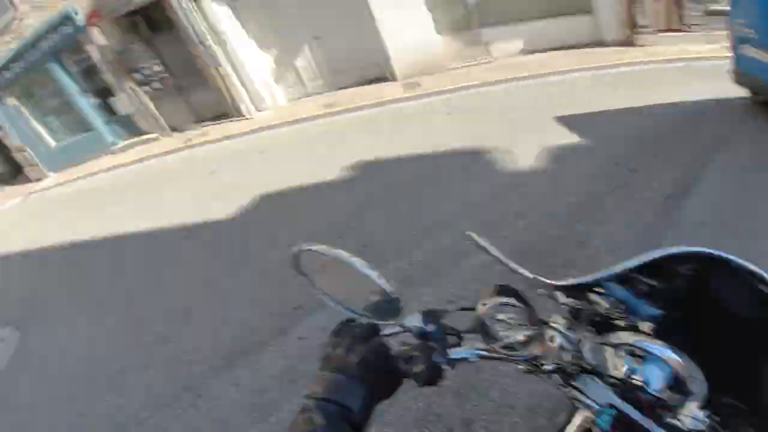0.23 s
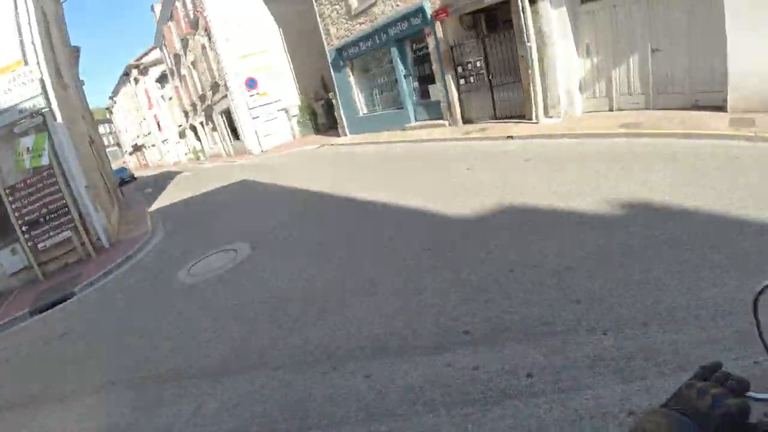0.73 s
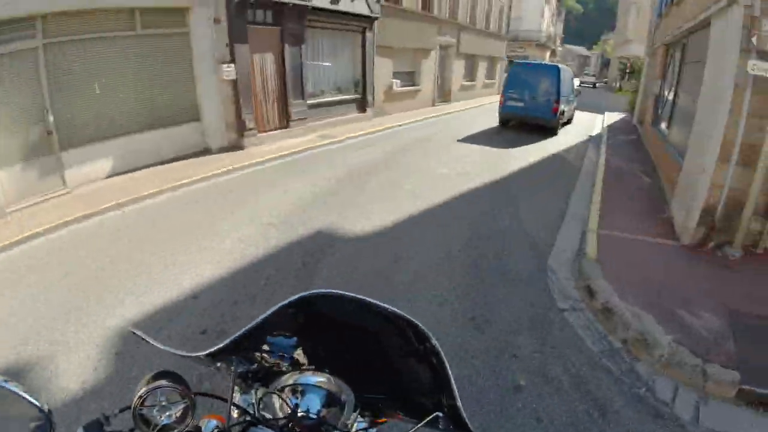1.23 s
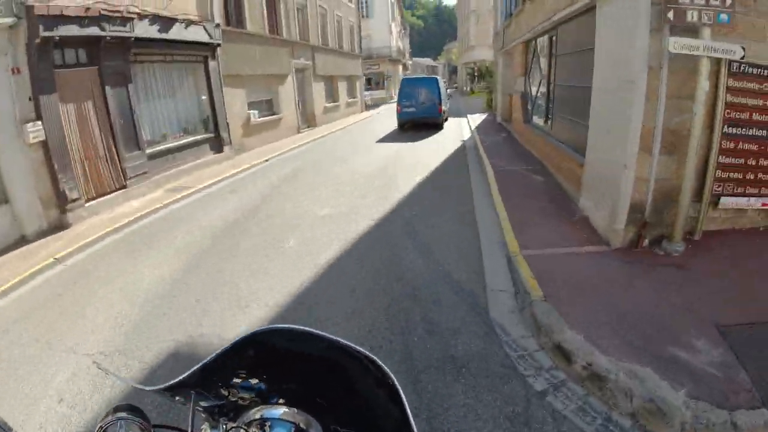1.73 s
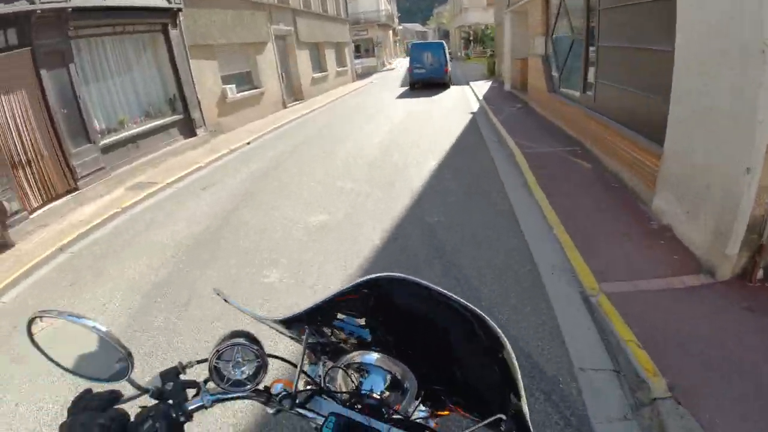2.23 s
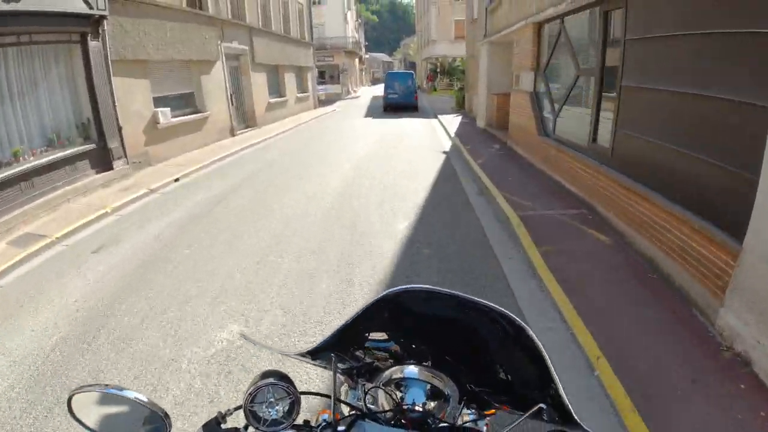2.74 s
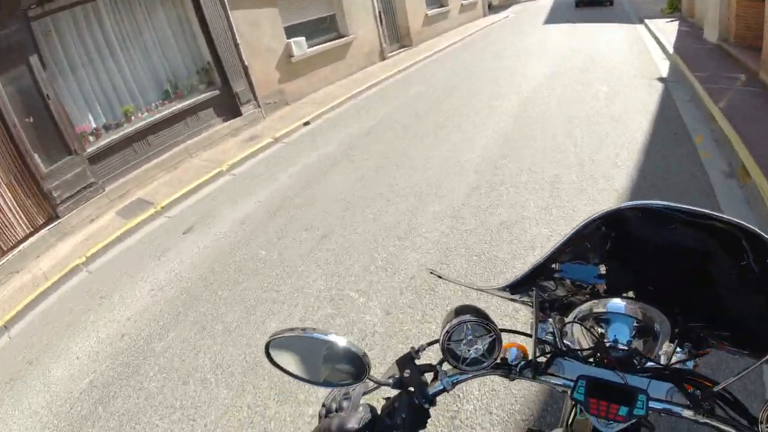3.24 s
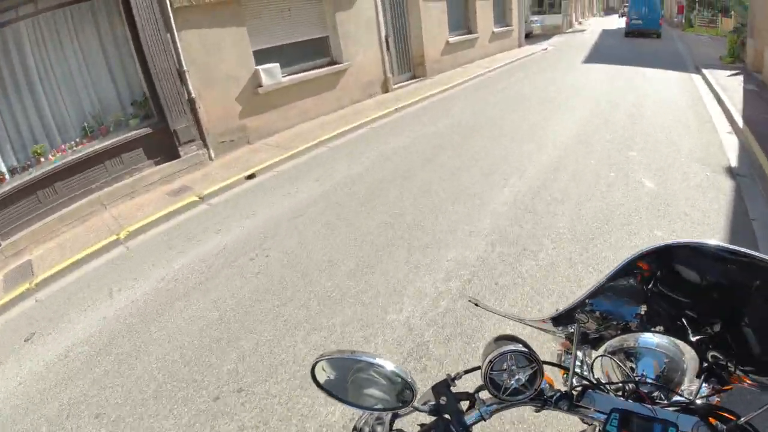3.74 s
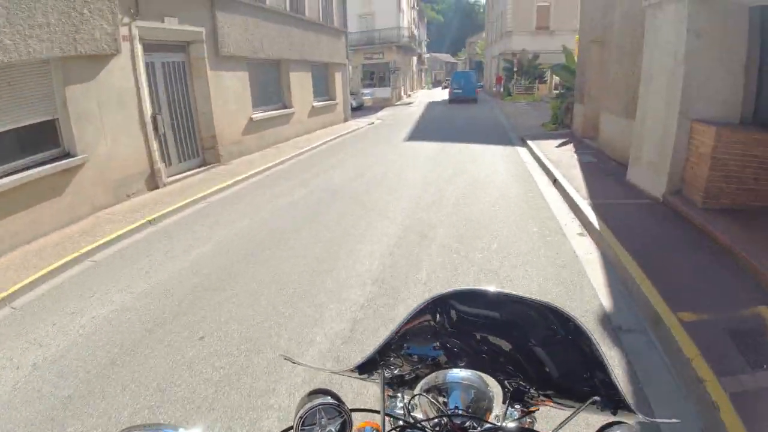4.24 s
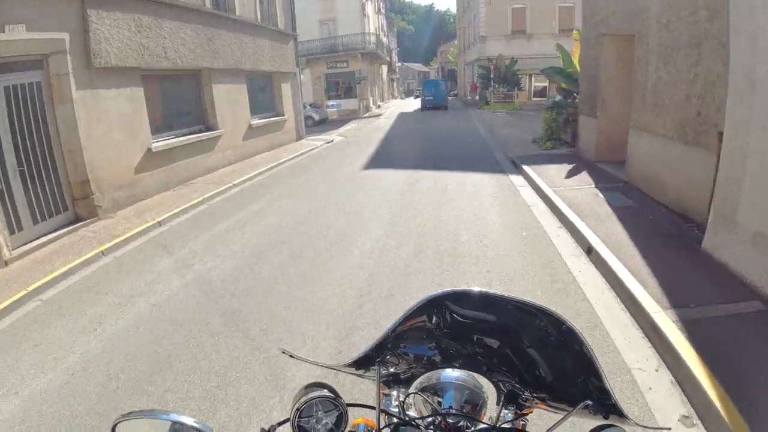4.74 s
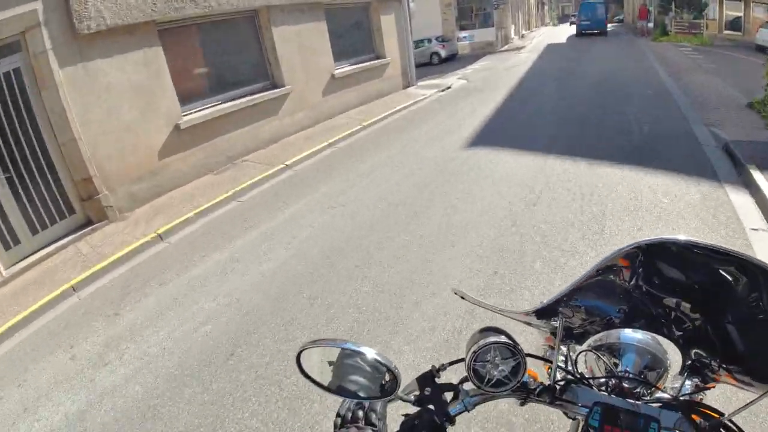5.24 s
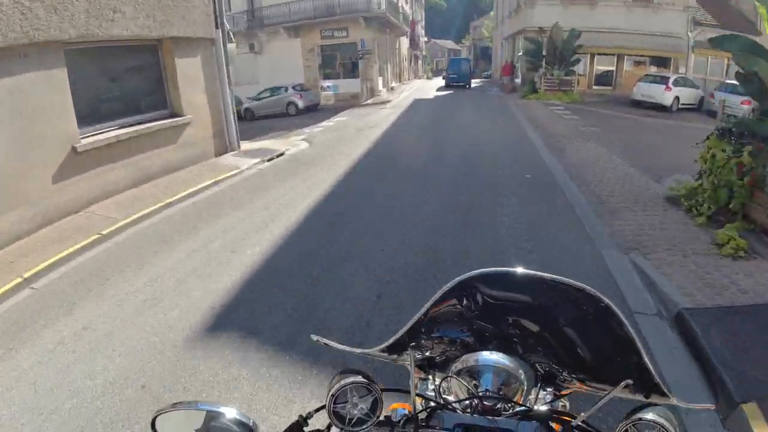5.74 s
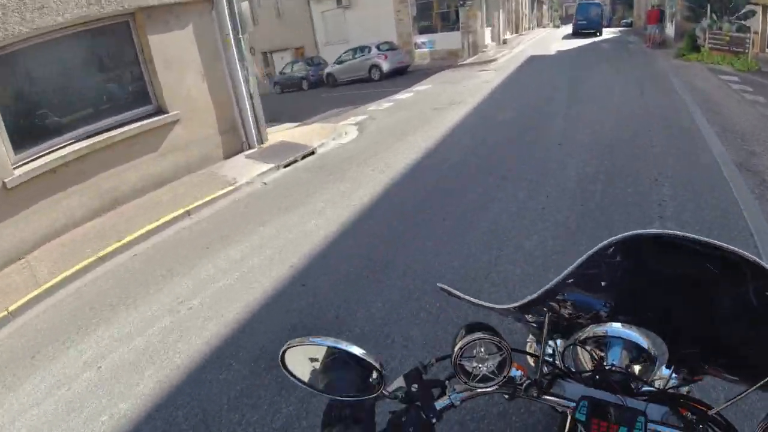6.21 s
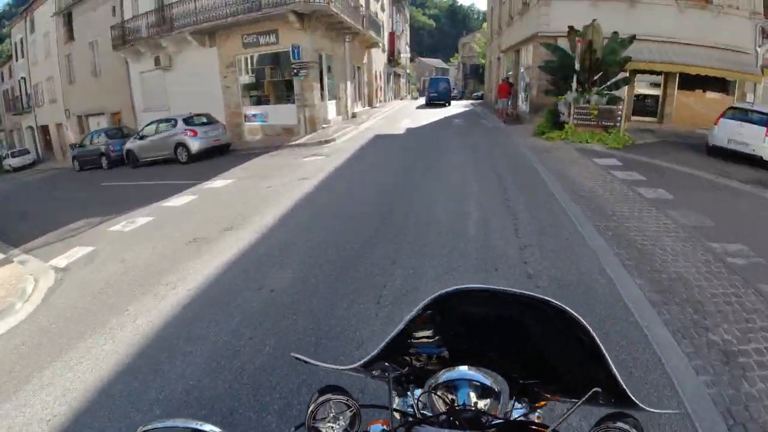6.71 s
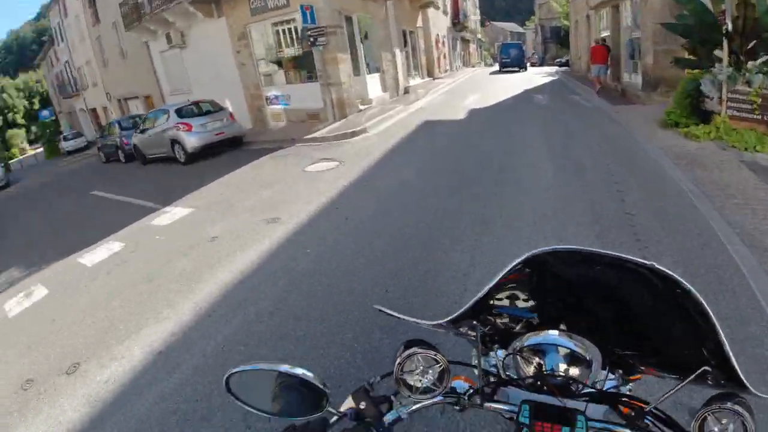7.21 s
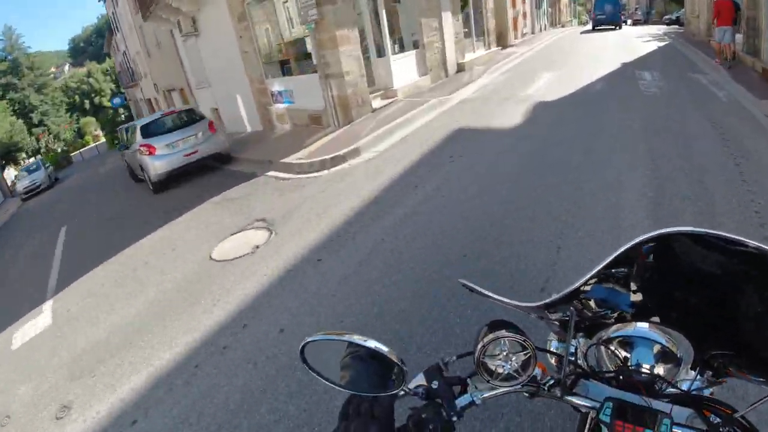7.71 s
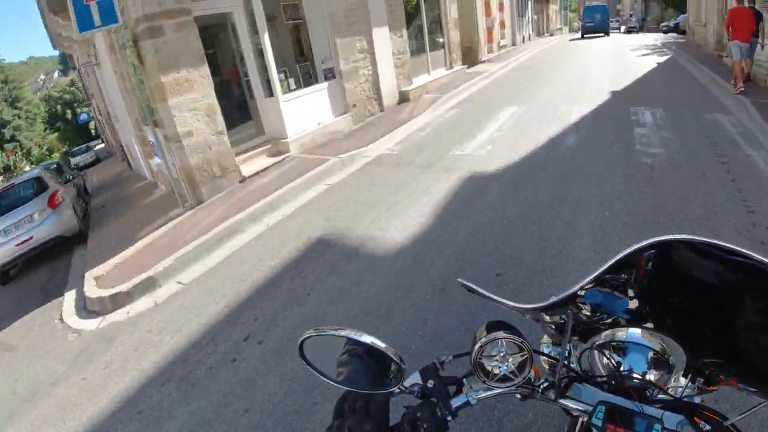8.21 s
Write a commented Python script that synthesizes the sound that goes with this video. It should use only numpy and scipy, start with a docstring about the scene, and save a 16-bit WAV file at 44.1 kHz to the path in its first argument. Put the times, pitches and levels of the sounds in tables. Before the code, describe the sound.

Heard from the rider's helmet, an uneven twin engine revs briefly, drops, climbs steadily with rising wind, then falls back burbling and popping.

```python
"""A small twin-cylinder motorcycle pulls away in a narrow street, heard from the rider's helmet: a blip,
a long pull, then the throttle closes partway. Uneven firings, built order by order, sound through silencer
and pipe with a gush of shaped noise; late pops ring the pipe. The intake hisses and the valve gear clatters
as gated noise, the headwind buffets the two microphone ports and street noise fills in behind."""
import sys
import numpy as np
from scipy import signal
from scipy.fft import rfft, irfft, next_fast_len
from scipy.io import wavfile
from scipy.ndimage import uniform_filter1d, map_coordinates

SR = 44100
rng = np.random.default_rng(int(sys.argv[2]) if len(sys.argv) > 2 else 0)


def pcm_store(signal):
    """Save signal as 16-bit PCM."""
    levels = np.round(np.clip(np.atleast_2d(signal), -1, 1) * 32767)
    wavfile.write(sys.argv[1], SR, levels.astype(np.int16).T)


N = 373086
STEP = 128  # samples between control values

# Silencer resonances. Each row: pitch in Hz, width in Hz, relative level in dB.
SILENCER_MODES = [(108.7, 20.5, 1), (196, 33.5, 4), (314.2, 60, 2), (335.7, 32.4, -1)]
# Exhaust pipe resonances. Each row: pitch in Hz, width in Hz, relative level in dB.
PIPE_MODES = [(386, 56.5, 7), (500, 136, 4.5), (782, 232, -3.5), (810.7, 67.6, -1), (1058, 15, -17),
              (1135, 710, -25)]
# Pressure pulses of a cycle, the two firings first. Each row: place in cycles, signed size with the throttle
# shut, signed size with it open.
PULSES = [(0.0094, 0.79, 0.81), (0.321, 0.77, 0.78), (.65, -1, -0.21)]
# The rider's hand. Each row: time in s, throttle opening from 0 to 1.
THROTTLE_MOVES = [(0, 0.29), (.25, 0.55), (.65, 0.63), (.95, 0.61), (1.4, 0.11), (1.8, 0.01), (2.65, 0.11),
                  (3.09, 0.29), (3.22, 0.76), (4, 0.79), (4.45, 0.77), (5, 0.79), (5.7, 0.84), (6.1, 0.83),
                  (6.3, 0.61), (6.6, 0.7), (7.0, 0.39), (7.45, 0.26), (8.46, 0.32)]

# Level laws: dB shut at the middle rate, dB gained wide open, dB per octave of speed, dB gained on the overrun.
# Orders 2 to 17 of the firings follow laws of their own instead.
THUD_LAW, BARK_LAW = (-24, 5.5, 10.5, -3.5), (-42, 16, 15, -3.5)


def amp(db):
    """Decibels to a linear gain."""
    return 10 ** (np.asarray(db) / 20)


def unit(x, axis=None):
    """Scale to an rms of 1."""
    return x / np.sqrt(np.mean(np.abs(x) ** 2, axis=axis) + 1e-20)


def clock(step=1):
    """Time in seconds, one value per step of samples."""
    return np.arange(0, N, step) / SR


def curves(rows, step=1):
    """One value per step of samples for each column after the time."""
    s, *columns = np.transpose(rows)
    return [np.interp(clock(step), s, column) for column in columns]


def chance(places):
    """A smooth random curve with one knot at each whole number of places."""
    return map_coordinates(rng.standard_normal(900), [places])


def filtered(x, response):
    """x times a complex response of frequency."""
    m = next_fast_len(N + 8192)  # padding keeps tails from wrapping round
    return irfft(rfft(x, m) * response(np.fft.rfftfreq(m, 1 / SR)), m)[..., :N]


def noise(points, channels=1):
    """Noise of rms 1 with a (Hz, dB) spectrum read on a log axis."""
    f, db = np.transpose(points)
    shape = lambda hz: amp(np.interp(np.log(hz + 1), np.log(f), db, -120, -120))
    return unit(filtered(rng.standard_normal((channels, N)), shape))


def ringing(modes, f):
    """Causal response of a set of resonances, alternating in sign."""
    response = 0
    for k, (centre, width, db) in enumerate(modes):
        mode = 1j * f * width / (centre * centre - f * f + 1j * f * width)
        response = response + (-1) ** k * amp(db) * mode
    return response


def streaky(x, depth_db):
    """Many small resonances come and go: narrow bands swell briefly, over broader, slower patches."""
    z = signal.stft(x, nperseg=1024)[2]
    narrow = uniform_filter1d(rng.standard_normal(z.shape[-2:]), size=16, axis=1, mode="wrap")
    broad = uniform_filter1d(rng.standard_normal(narrow.shape), size=40, axis=0)
    broad = uniform_filter1d(broad, size=5, axis=1)
    field = unit(narrow) + 3 * broad
    return unit(signal.istft(z * amp(depth_db * unit(field)), nperseg=1024)[1][..., :N])


def ports(x, lag_ms, apart=0, apart_db=0):
    """Sound from below reaches the left port late; a scattered part differs between the ports."""
    late_left = np.array([[1], [0]])
    pair = filtered(x, lambda hz: np.exp(-2j * np.pi * hz * lag_ms / 1000 * late_left))
    return pair + amp(apart_db) * apart


def shaft_rate(step=1):
    """Engine cycles per second; the flywheel rounds every change of speed."""
    # Engine speed. Each row: time in s, rate in cycles per s.
    speed_moves = [(0, 30.5), (.3, 38.8), (.61, 42.7), (.96, 40.1), (1.17, 32.6), (1.36, 27), (1.72, 20.2),
                   (1.9, 21.8), (2.3, 24.3), (2.6, 26.4), (3.1, 31), (3.46, 34.8), (3.86, 38.5),
                   (4.57, 44.4), (5.18, 49.4), (5.89, 54.8), (6.34, 58), (6.54, 58.8), (6.66, 54.5),
                   (6.93, 48.4), (7.28, 39.8), (7.52, 31.5), (7.66, 34.4), (8.15, 32.3), (8.46, 31.5)]
    return uniform_filter1d(curves(speed_moves, step)[0], size=SR // 12 // step)


def drive(step=1):
    """Throttle opening, octaves above the middle speed and overrun share."""
    middle_rate = 40  # cycles per s
    overrun_s, overrun_rise_s = 6.55, .06  # the wheel starts to drive the engine
    overrun = np.clip((clock(step) - overrun_s) / overrun_rise_s, 0, 1)
    return curves(THROTTLE_MOVES, step)[0], np.log2(shaft_rate(step) / middle_rate), overrun


def level_db(law, step=1):
    """A level from throttle, speed and overrun."""
    return np.interp(clock(step), clock(STEP), law[0] + np.dot(law[1:], drive(STEP)))


def bite():
    """How much wider the throttle stands than a moment ago: a short past mean less a longer one."""
    rise_s, long_s = .18, .55
    opening = curves(THROTTLE_MOVES)[0]
    past = lambda size: uniform_filter1d(opening, size=size, origin=(size - 1) // 2, mode="nearest")
    return np.clip(past(round(rise_s * SR)) - past(round(long_s * SR)), 0, 1)


def puffs(depth):
    """A gate that opens after each of the two firings and decays."""
    cycles = np.cumsum(shaft_rate()) / SR
    gate = sum(np.exp(-((cycles - place) % 1) / 0.24) for place, *_ in PULSES[:2])
    return unit(1 - depth + depth * gate)


def booming(orders, hz, throttle, size_db, cycles, beating, phase):
    """Orders 2 to 17 boom by level laws of their own, coloured by the body's resonances."""
    # One row per order from the second up: dB shut at the middle rate, dB gained wide open, dB per octave
    # of speed, dB gained on the overrun; all before the body's colour.
    boom_laws = [(-35.5, -2, 15.5, 0.5), (-35.5, -4.5, 14, 15.5), (-27, -10.5, 12, 0.5),
                 (-35.5, 10, -5.5, -9.5), (-32.5, 8.5, 5.5, -21.5), (-47, 11.5, 5, -5), (-40, 8.5, -3, -2),
                 (-40.5, 13.5, -2, -8), (-43.0, 3.5, 16, -5.0), (-36.5, -4, 5.5, -9), (-48.5, 13, -1.5, -9),
                 (-46.5, 6, 0, -3.5), (-47, 0.5, -3, -1.5), (-50.0, 11, 6, -4), (-47.5, 1.5, -1, -2.5),
                 (-49.5, 5.5, 1.5, -7.5)]
    # Body colour. Each row: pitch in Hz, dB with the throttle shut, dB with it open.
    body_colour = [(72, -5.5, 0), (106, -11, 2), (127.5, -6, -2), (162, 0, -11), (202.6, 0.5, 3),
                   (247, 1, 0.5), (309, 11.5, 3.5), (328, 6, 1), (393, -8.5, -4.5), (453, -8, -.5),
                   (590, 5, -1)]
    body_hz, *body_db = np.transpose(body_colour)
    burn_db = size_db * chance(cycles)  # a strong or weak cycle moves all these orders alike
    for row, law in enumerate(boom_laws, 1):
        shut_db, wide_db = (np.interp(np.log(hz[row]), np.log(body_hz), column) for column in body_db)
        colour_db = shut_db + (wide_db - shut_db) * throttle
        scatter_db = .5 * burn_db + .5 * size_db * chance(cycles)
        orders[row] = amp(level_db(law, STEP) + colour_db + scatter_db) * beating[row] * phase[row]


def swells_and_walls(hz):
    """Gain as the whole note swells or sags and single parts stand out or fade, partly as walls pass."""
    # The whole note. Each row: time in s, gain in dB.
    note_swells = [(3.1, -4), (4.8, 2.5), (5.43, -3), (5.62, 3), (5.92, -4), (6.28, -3), (6.66, 5.5)]
    # One part of the note. Each row: time in s, pitch in Hz, gain in dB, length in s.
    part_swells = [(.12, 175, 10, .08), (.72, 330, 8, .3), (.65, 537, 11, .3), (.65, 860, 6, .3),
                   (2.4, 224, 7.5, .15), (3.05, 155, 8.5, .3), (3.54, 235, 10, .15), (3.6, 382, 10.5, .15),
                   (3.72, 203, -10.5, .5), (3.84, 100, 8, .3), (3.7, 780, 7, .5), (4.44, 347, 12, .15),
                   (4.5, 89, -9, .3), (4.68, 364, 7, .15), (4.8, 315, -10, .3), (5.82, 272, -16, .5),
                   (6.1, 1000, 10, .5), (6.63, 275, 12, .1), (6.73, 545, 9, .12), (6.78, 103, -9.5, .3),
                   (7.2, 570, 7.5, .3), (8.04, 131, -10.5, .5), (8.1, 421, -10, .6), (8.2, 235, -9, .5)]
    swell_s, part_octaves = 0.12, 0.12  # length of a whole-note swell, width of a part
    seconds = clock(STEP)
    db = sum(gain * np.exp(-((seconds - s) / swell_s) ** 2) for s, gain in note_swells)
    for s, at_hz, gain, long in part_swells:
        off_pitch = np.log2(hz / at_hz) / part_octaves
        db = db + gain * np.exp(-((seconds - s) / long) ** 2 - off_pitch ** 2)
    return amp(db)


def sound_orders(orders):
    """Each order turns a carrier at its own multiple of the cycle rate."""
    coarse = 8  # the low note is built on every eighth sample
    turn = np.exp(2j * np.pi * np.cumsum(shaft_rate(coarse)) * coarse / SR)
    at, knots = np.arange(0, N, coarse) / STEP, np.arange(orders.shape[1])
    total, carrier = 0, 1
    for row in orders:
        carrier = carrier * turn
        total = total + np.sqrt(2) * (np.interp(at, knots, row) * carrier).real
    return signal.resample_poly(total, coarse, 1)[:N]


def firings():
    """The repeating pulses of a cycle, written as its orders, each through silencer and pipe."""
    wide_at = 0.46  # opening from which the pulses keep their open pattern
    steady_size_db, shut_size_db, overrun_size_db = 1, 1, .5  # scatter of sizes; lean mixture adds to it
    late_shut_ms, late_open_ms = .13, .03  # scatter of pulse times
    echo_slow, echo_fast, fast_s = .08, .5, 5  # wall echo share, growing over these seconds as walls pass faster
    overrun_echo = .5  # the upper orders burble loosely on the overrun
    echo_full_order = 9  # lower booming orders feel the walls less
    chirp_ms, chirp_top_hz = 11, 450  # open-throttle delay, full from this pitch up

    rate, (opening, _, overrun) = shaft_rate(STEP), drive(STEP)
    cycles = np.cumsum(rate) * STEP / SR
    throttle = np.clip(opening / wide_at, 0, 1)
    size_db = steady_size_db + shut_size_db * np.clip(1 - opening / wide_at, 0, 1) + overrun_size_db * overrun
    scatter_ms = late_shut_ms + (late_open_ms - late_shut_ms) * np.clip(opening, 0, 1)
    echo = np.interp(clock(STEP), [0, fast_s], [echo_slow, echo_fast])
    k = np.arange(1, 41)[:, None]  # order: multiples of the cycle rate
    hz = k * rate

    source, even_source = 0, 0
    for place, shut, wide in PULSES:  # every pulse comes a little stronger or later than the last
        late = place + rate * scatter_ms / 1000 * chance(cycles)
        size = shut + (wide - shut) * throttle
        source = source + size * amp(size_db * chance(cycles)) * np.exp(-2j * np.pi * k * late)
        even_source = even_source + size * np.exp(-2j * np.pi * k * place)  # without scatter

    muffled = ringing(SILENCER_MODES, hz) / (1 + 1j * hz / 420) ** 2 * 1j * hz / (70 + 1j * hz)
    piped = ringing(PIPE_MODES, hz)
    thud = source * muffled
    bark = source * piped * (1j * hz / (300 + 1j * hz)) ** 2
    steady = lambda z: z / np.sqrt(uniform_filter1d(np.sum(np.abs(z) ** 2, axis=0), size=40))
    orders = amp(level_db(THUD_LAW, STEP)) * steady(thud) + amp(level_db(BARK_LAW, STEP)) * steady(bark)

    # echoes from passing walls lift and cancel each order
    wall = lambda: np.array([chance(cycles / 4.5) + 1j * chance(cycles / 4.5) for _ in k])
    orders *= 1 + echo * wall()
    share = (echo + overrun_echo * overrun) * np.minimum(k / echo_full_order, 1) ** 2
    beating = (1 + share * wall()) / np.sqrt(1 + share ** 2)

    # the booming orders take only their phase from the pulses: silencer below, pipe above
    low_path = np.where(hz < chirp_top_hz, muffled, 0) / np.abs(muffled)
    high_path = np.clip(hz / chirp_top_hz - 1, 0, 1) * piped
    even = (low_path + high_path + 1e-6) * even_source
    booming(orders, hz, throttle, size_db, cycles, beating, even / np.abs(even))
    orders *= swells_and_walls(hz)

    # under load the baffles hold back higher pitches
    held = np.minimum(hz, chirp_top_hz)
    orders *= np.exp(-2j * np.pi * throttle * chirp_ms / 1000 * held / chirp_top_hz * (hz - held / 2))
    return sound_orders(orders)


def turbulence():
    """Gas rushing through silencer and pipe blurs the gaps between the orders."""
    silencer_gas, pipe_gas = (-19.5, -3, -1.5, 11), (1, -15, .1, -1)  # added to the thud and bark laws

    def gas(modes):
        scattered = rng.standard_normal((2, N))
        rush = ports(rng.standard_normal(N), .11, scattered, apart_db=-4) * puffs(0.91)
        return unit(filtered(rush, lambda hz: ringing(modes, hz + 1)))

    low = amp(level_db(np.add(THUD_LAW, silencer_gas))) * gas(SILENCER_MODES)
    high = amp(level_db(np.add(BARK_LAW, pipe_gas))) * gas(PIPE_MODES)
    return low + high


def hiss():
    """Intake air hisses in puffs and follows the throttle."""
    # Each row: pitch in Hz, relative level in dB per Hz.
    intake_spectrum = [(2060, -27), (3500, -10.5), (4570, -16), (6280, -10), (7120, -15), (9070, -11),
                       (10900, -2.5), (12200, -8), (15500, -20.5)]
    intake_law = (-68.5, 32.5, 3, -3)  # columns as in the thud law
    snap_db = 2  # extra per unit of bite as the throttle snaps open
    flutter_db = 1.1 * chance(clock() * 12)
    scattered = noise(intake_spectrum, channels=2)
    air = ports(noise(intake_spectrum)[0] * puffs(0.4), 0.167, scattered, apart_db=-0.5)
    return amp(level_db(intake_law) + snap_db * bite() + flutter_db) * streaky(air, depth_db=3.2)


def clatter():
    """Valve gear and chain rattle, the airbox rasps; each casing rings up and fades on its own."""
    # Rattle. Each row: pitch in Hz, relative level in dB per Hz.
    rattle_spectrum = [(530, 1.5), (900, -10), (1350, -16.5), (2210, -19.5), (3090, -21), (5000, -34.5),
                       (6500, -46), (11000, -120)]
    # Ringing metal. Each row: pitch in Hz, width in Hz, relative level in dB.
    casing_modes = [(1182, 18, 2), (2030, 20, 2.5), (2240, 23, 6), (2716, 55, -0.5), (3470, 104, -8)]
    rattle_law = (-49.5, 13.5, 12, -1)  # columns as in the thud law
    snap_db = 4.5  # extra rattle per unit of bite
    rasp_mode, rasp_db = (1700, 650, 0), -34.5  # Hz, width Hz, dB; the level is per unit of bite
    shudder_s, shudder_long_s, shudder_db = 1.15, .17, 6  # the casings shake as the revs fall back
    seconds, knocks = clock(), puffs(0.57)

    def knocked(response):
        return filtered(rng.standard_normal(N) * knocks, response)

    rings = 0
    for mode in casing_modes:
        swell = amp(3.5 * chance(seconds * 4))
        rings = rings + swell * knocked(lambda hz: ringing([mode], hz + 1))
    ring_db = -8.0 + shudder_db * np.exp(-((seconds - shudder_s) / shudder_long_s) ** 2)
    near = noise(rattle_spectrum)[0] * knocks + amp(ring_db) * unit(rings)
    rattle = streaky(ports(near, .15, noise(rattle_spectrum, channels=2), apart_db=-3), depth_db=4.5)
    rasp = unit(knocked(lambda hz: ringing([rasp_mode], hz) ** 2))
    shake_db = 1.2 * chance(seconds * 7)
    rattle = amp(level_db(rattle_law) + snap_db * bite() + shake_db) * rattle
    return rattle + amp(rasp_db + shake_db) * bite() * ports(rasp, .15)


def headwind():
    """Headwind buffets the ports in lumps of low noise, partly separate at each port."""
    # Each row: time in s, buffet level in dB before a common lift.
    wind_levels = [(0.0, -67), (2.78, -58), (4.3, -47.5), (4.95, -41.5), (6.22, -44), (6.57, -39.5),
                   (8.46, -51)]
    # Each row: pitch in Hz, relative level in dB per Hz.
    buffet_spectrum = [(15, -15.5), (30, -8), (60, -3), (120, -12), (300, -13), (700, -47)]
    lumps = amp(3 * chance(clock() * 7))
    buffets = ports(noise(buffet_spectrum)[0], 0, noise(buffet_spectrum, channels=2), apart_db=1)
    return amp(curves(wind_levels)[0] + 3.5) * lumps * buffets


def street():
    """Tyres and traffic fill the street as streaky noise, nearly alike at both ports."""
    # Each row: pitch in Hz, relative level in dB per Hz.
    street_spectrum = [(410, -31.5), (700, 4.5), (850, -3.5), (1800, -16.5), (2250, -11), (7800, -40),
                       (11200, -29), (13300, -35), (15500, -71)]
    # Each row: time in s, level in dB.
    street_levels = [(0, -40), (1.5, -54), (6.4, -40.5), (7, -52.5), (8.46, -53.5)]
    scattered = noise(street_spectrum, channels=2)
    bed = ports(noise(street_spectrum)[0], 0.018, scattered, apart_db=-14.5)
    return amp(curves(street_levels)[0]) * streaky(bed, depth_db=4)


def pops():
    """Unburnt mixture lights late in the pipe as the throttle closes: short bursts ring its modes."""
    # Late burns. Each row: time in s, peak in dB.
    late_burns = [(6.892, -16), (7.06, -19), (7.147, -23), (7.17, -18.5), (7.267, -21)]
    burst = amp(-60 * clock() / .004)  # falls 60 dB in 4 ms
    pop = filtered(burst, lambda hz: ringing(PIPE_MODES[1:], hz + 1))[:SR // 20]
    blows = np.zeros(N)
    for s, db in late_burns:
        blows[round(s * SR)] = amp(db)
    return signal.fftconvolve(blows, pop / np.abs(pop).max())[:N]


def scene():
    """Exhaust from below, its gas, intake, mechanics, wind and street together."""
    exhaust = ports(firings() + pops(), 0.11)
    return exhaust + turbulence() + hiss() + clatter() + headwind() + street()


def record(dry):
    """Nothing from the band limit up is kept."""
    top_hz = 15680
    return filtered(dry, lambda hz: hz < top_hz)


dry = scene()
out = record(dry)
pcm_store(out)
```